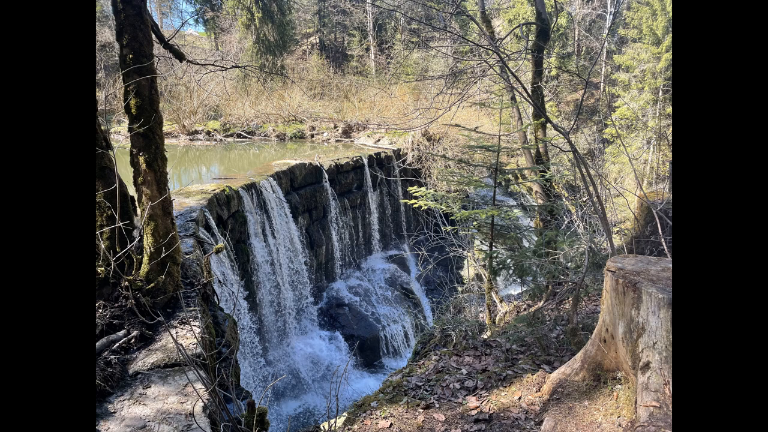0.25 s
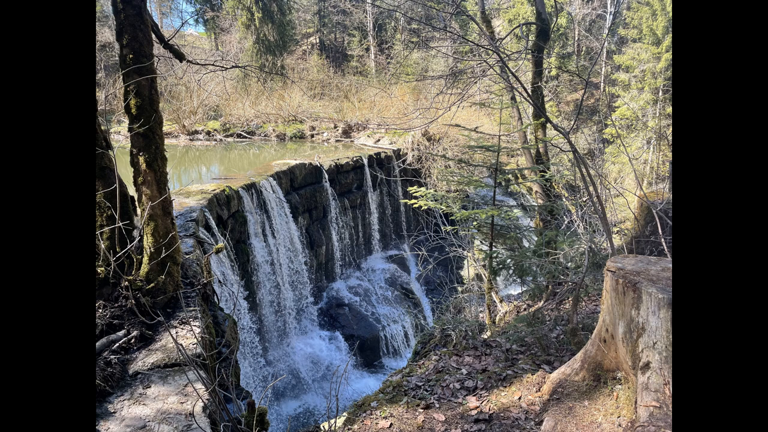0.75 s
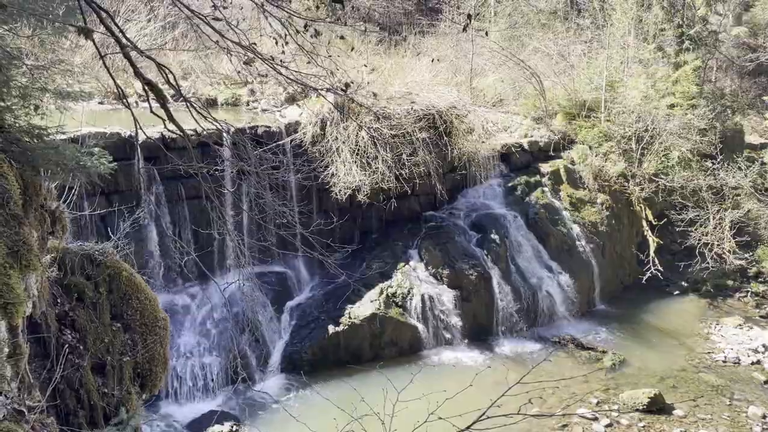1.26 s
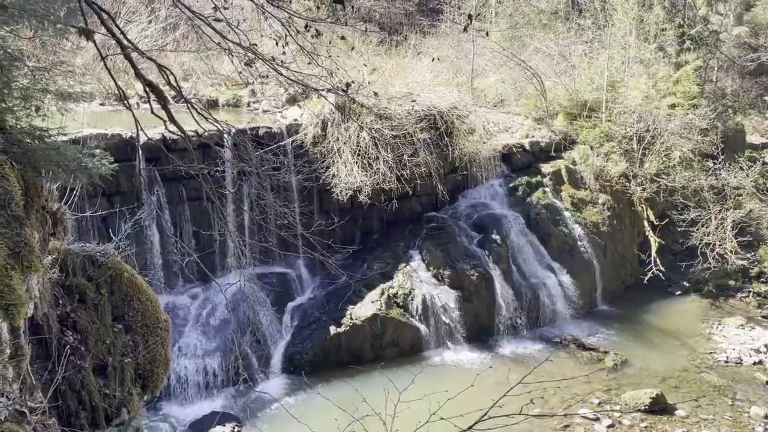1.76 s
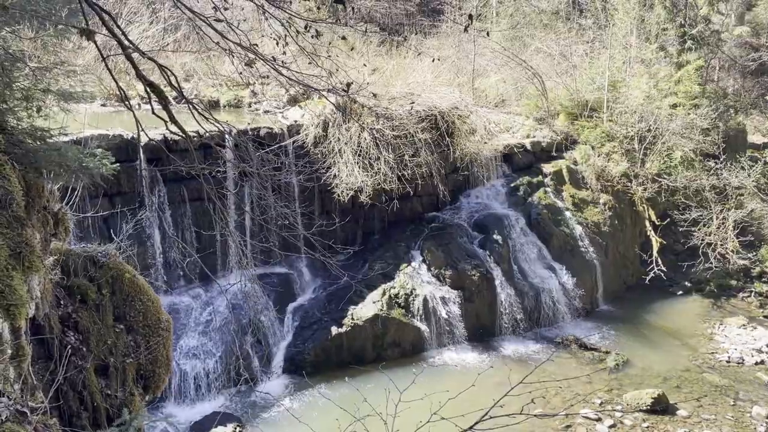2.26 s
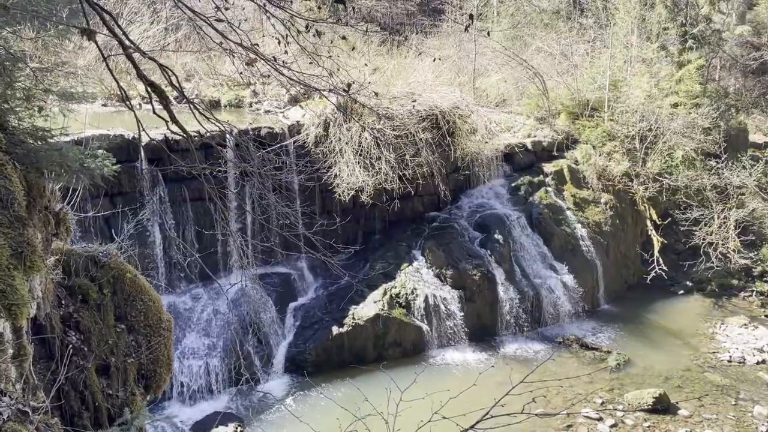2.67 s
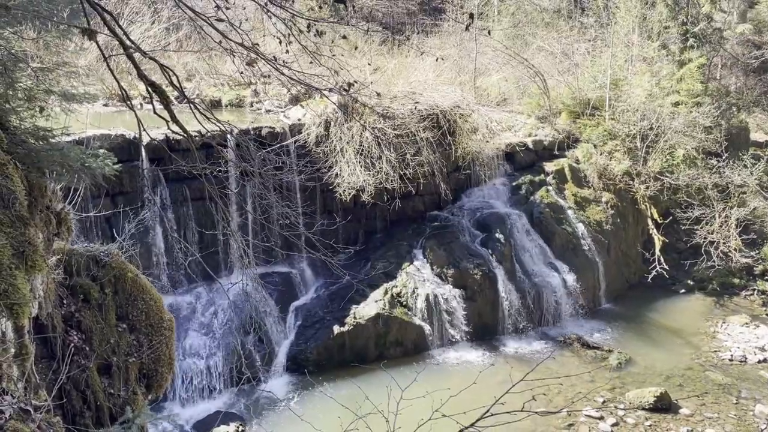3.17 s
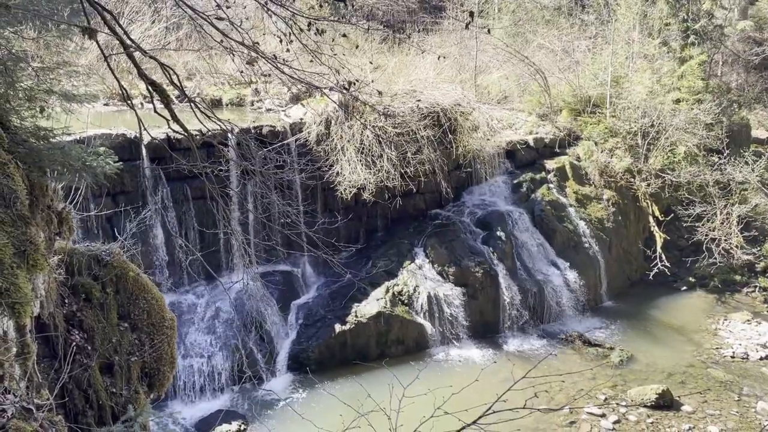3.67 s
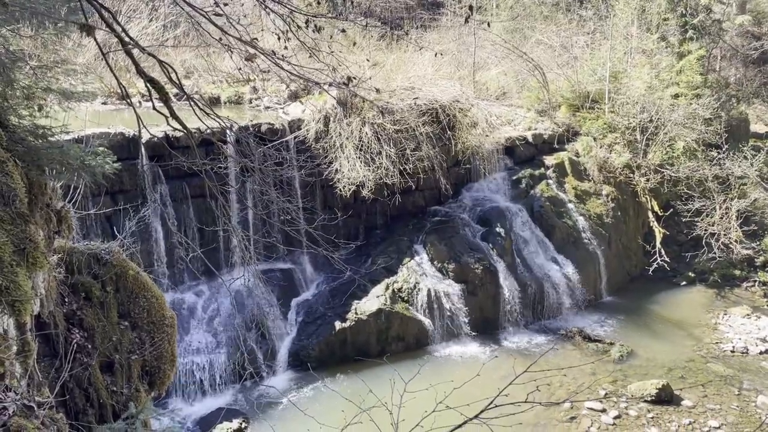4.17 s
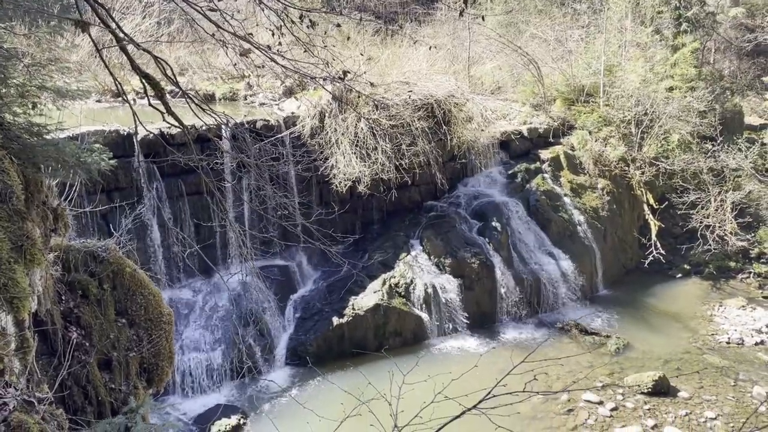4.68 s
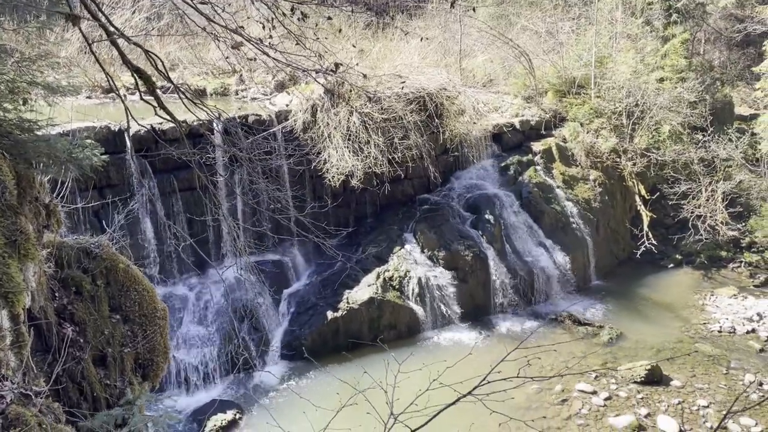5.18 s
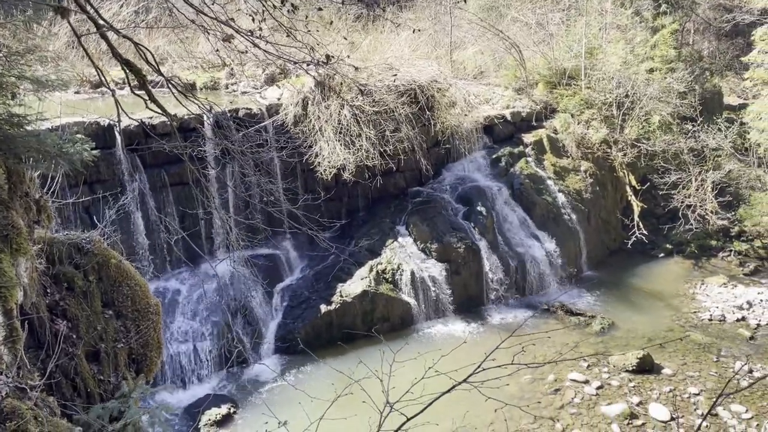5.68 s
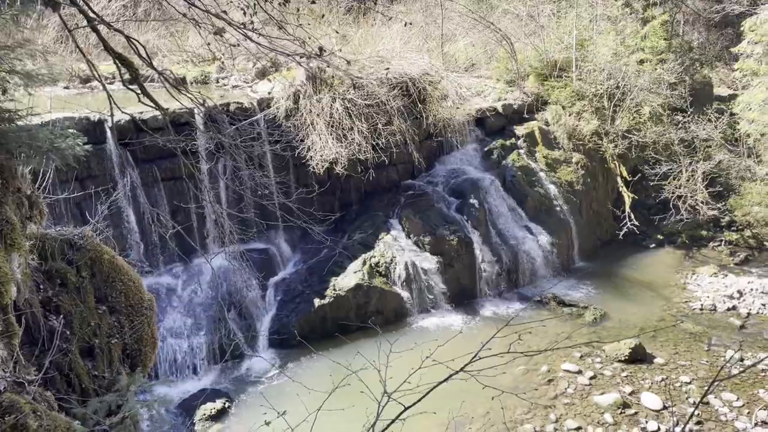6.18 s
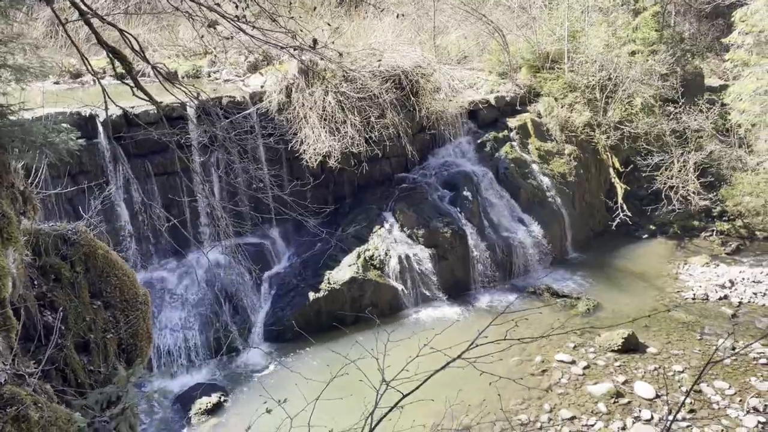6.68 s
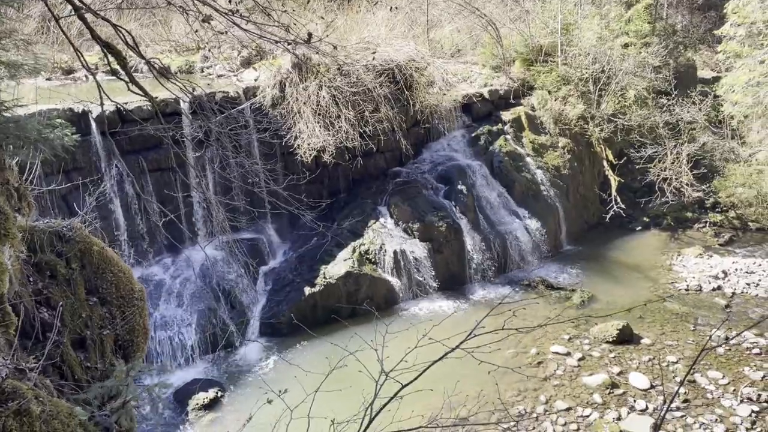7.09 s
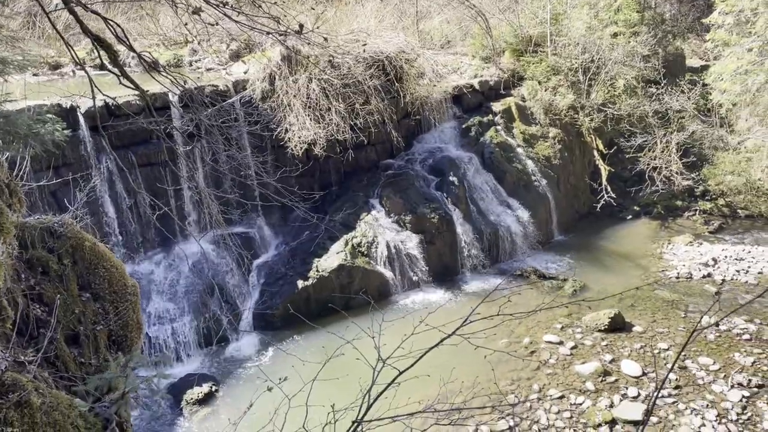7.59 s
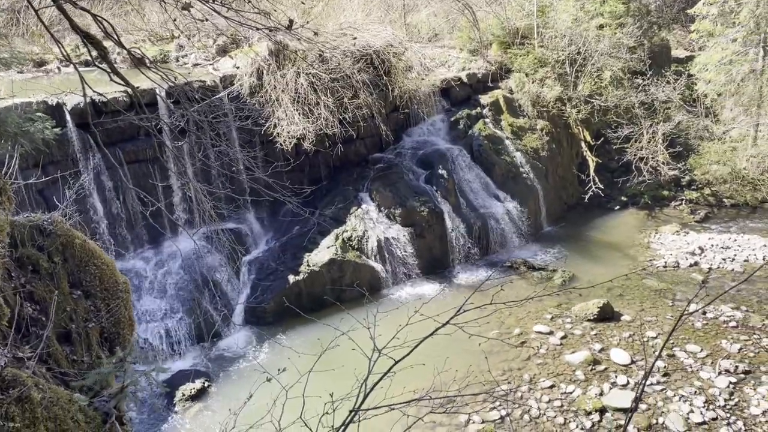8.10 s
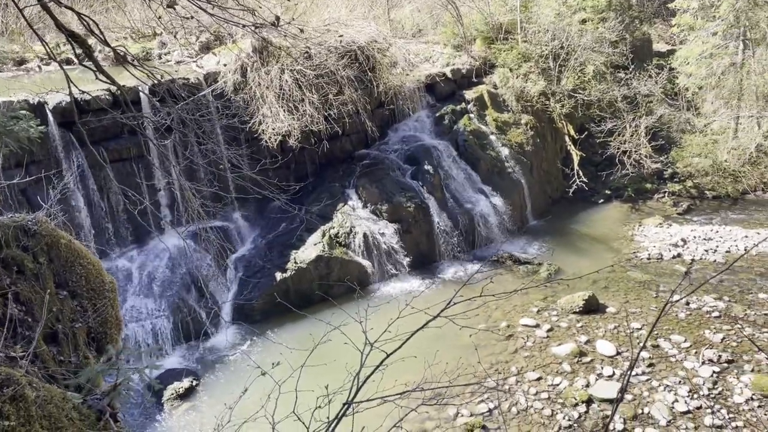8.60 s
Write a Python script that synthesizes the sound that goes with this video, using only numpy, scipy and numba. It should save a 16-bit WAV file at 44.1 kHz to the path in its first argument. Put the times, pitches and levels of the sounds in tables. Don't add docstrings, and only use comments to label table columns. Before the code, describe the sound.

The first 0.9 seconds are silent. Then, with a hard cut and no fade, a steady rush of several thin waterfalls begins, pouring over mossy rock ledges into a shallow pool outdoors, about twenty metres from a hand-held stereo microphone. Countless bubbles and droplets blur into a broad, even hiss with a full middle, soft top and only thin bass; it flickers slightly but barely changes level. It starts a touch fuller, eases by 1.2 seconds, and holds steady. A light breeze buffets the microphone with dull low thumps: scattered ones from 1 to 2.3, a cluster around 3, more near 3.6 to 4, and the heaviest bump at about 5.2 amid a busy run to 5.9. Wind is calmer from 6 to 7, with isolated bumps around 7.2 to 7.7 and a renewed flurry from 8.2 to 8.6. The water thins slightly, with more spray, at the end.

```python
import sys
import numpy as np
from scipy import signal
from scipy.fft import rfft, irfft, next_fast_len
from scipy.io import wavfile
from scipy.ndimage import uniform_filter1d
from numba import njit

SR = 44100
rng = np.random.default_rng(int(sys.argv[2]) if len(sys.argv) > 2 else 0)


def put_to_file(sound):
    columns = np.atleast_2d(sound).T
    safe = np.clip(columns, -1, 1)
    whole_steps = np.round(safe * 32767)
    wavfile.write(sys.argv[1], SR, whole_steps.astype(np.int16))


def decibels_to_gain(level_db):
    exponent = np.asarray(level_db, float) / 20
    return 10 ** exponent


N = 390285
START_S = .8867
SIZE = next_fast_len(N)
HZ = np.arange(SIZE // 2 + 1) * SR / SIZE

# t/s, flow level/dB, spray over flow/dB
FALLS_FLOW = [
    (0.9, -28.5, -4.5),
    (1.21, -30.5, -2.5),
    (2.65, -29.5, -3.5),
    (4.66, -29.5, -3.5),
    (6.52, -29.5, -2.5),
    (8.81, -30.5, -2.5),
    (8.85, -31.5, 0),
]
# f/Hz, density/dB per Hz
LEFT_COLOUR = [(300, -2.2), (580, 1), (1000, .6), (1800, -.8), (2050, -4.6), (2600, -6.5), (5500, -6.8),
               (6050, -9.8), (6600, -10), (8000, -12), (10000, -14), (11000, -16.8), (13000, -18.7),
               (15500, -18.2)]
# f/Hz, right minus left/dB
RIGHT_SHADE = [(400, 0), (550, -1.2), (1000, -2.5), (1750, -3.2), (2050, -.5), (2400, 0), (2800, -1.5),
               (3300, -.8), (4100, -3), (5000, -1), (5600, -3), (6200, -2), (7200, -1.5), (7900, 0)]
# f/Hz, likeness/0-1
PORT_LIKENESS = [(280, .92), (550, .64), (950, .63), (1350, .53), (1700, .32), (2100, .74), (2700, .65),
                 (3300, .72), (4200, .48), (5500, .68), (7200, .8), (7900, .93), (8700, .92), (10600, 1)]
# f/Hz, phase/rad
RIGHT_LEAD = [(300, .3), (700, 0), (1800, -.4), (2050, -.1), (2700, -1), (4300, .3), (5200, -.3),
              (6400, .6), (7200, 1.8), (8130, 3.14), (11000, 5.95), (12200, 6.65), (14900, 9.42),
              (16000, 10.5)]
# f/Hz, density/dB per Hz
PLUNGE_BASS = [(30, -45), (60, -13), (110, -5.5), (160, -6), (220, -2.5)]
# t/s, level/dB
BREEZE_LEVEL = [(.9, -41), (1.3, -47), (2.2, -45), (2.55, -60), (2.75, -44), (3.1, -33), (3.48, -46),
                (3.84, -39.5), (4.4, -41.5), (4.74, -37), (5.3, -36.5), (5.65, -42.5), (6.3, -51.5),
                (6.61, -37), (6.97, -54), (7.55, -40), (8.5, -36), (8.85, -44)]
# f/Hz, density/dB per Hz
EDDY_COLOUR = [(15, -30), (25, -24), (47, 2.5), (70, 2.5), (150, -7.5), (220, -14), (400, -41.5)]
# t/s, peak level/dB, f/Hz
STRONG_EDDIES = [(1.011, -24, 114), (1.79, -22.5, 162), (2.293, -25, 112), (2.821, -22.5, 111),
                 (2.975, -24, 80), (3.03, -18, 86.5), (3.241, -25, 72), (3.576, -21, 102),
                 (3.87, -21, 85.5), (4.017, -25, 62), (4.258, -27, 93), (4.708, -25, 69), (4.747, -26, 66),
                 (4.961, -25, 76), (5.156, -23, 100), (5.1675, -14.5, 126), (5.247, -18, 84),
                 (5.314, -21, 94.5), (5.424, -19.5, 119), (5.576, -22.5, 101), (5.707, -26, 122),
                 (5.938, -23.5, 104), (7.21, -26, 133), (7.556, -27, 87), (7.666, -25, 66),
                 (8.178, -22.5, 74), (8.251, -26, 85.6), (8.398, -22, 115), (8.565, -20, 91),
                 (8.641, -22, 71)]


def over_hz(table, warp=np.log1p):
    hz, value = np.transpose(table)
    return np.interp(warp(HZ), warp(hz), value)


def over_time(table):
    s, *columns = np.transpose(table)
    return [np.interp(np.arange(N) / SR, s, column) for column in columns]


def unit(x):
    return x / np.sqrt(np.mean(x ** 2))


def walk(rate):
    hold = int(SR / rate)
    steps = np.repeat(rng.standard_normal(N // hold + 1), hold)
    slewed = uniform_filter1d(uniform_filter1d(steps, hold), hold)
    return unit(slewed[:N])


@njit
def bubble_rings(start, hz, cycles, size, glide):
    out = np.zeros(N)
    for b in range(len(start)):
        length = cycles * SR / hz[b]
        ring = size[b] + 0j
        step = np.exp(2j * np.pi * hz[b] / SR - 3 / length)
        climb = np.exp(2j * np.pi * hz[b] / SR * glide / length)
        for i in range(start[b], min(N, start[b] + int(2 * length))):
            out[i] += ring.imag
            ring, step = ring * step, step * climb
    return out


def foam(count=90000):
    when, pitch, big = rng.random((count, 3)).T
    start = (when * N).astype(np.int64)
    hz = 250 * 40 ** pitch
    size = decibels_to_gain(15.3 * big) * hz ** .5
    bubbles = bubble_rings(start, hz, 5.0, size, 0.14)
    hiss = rng.standard_normal(N)
    rush = rfft(hiss + decibels_to_gain(-15.0) * unit(bubbles), SIZE)
    out, surge = 0, walk(5)
    for octave in range(12):
        distance = np.clip(np.log2(HZ / 10 + 1e-9) - octave, -1, 1)
        band = np.cos(distance * np.pi / 2) ** 2
        flicker_db = .2 * surge + .3 * walk(8) + .5 * walk(20)
        out = out + irfft(rush * band, SIZE)[:N] * decibels_to_gain(flicker_db)
    return rfft(out, SIZE)


def falls():
    shared, apart = foam(), foam()
    like = over_hz(PORT_LIKENESS)
    lead = np.exp(1j * over_hz(RIGHT_LEAD, np.asarray))
    right = like * shared * lead + np.sqrt(1 - like ** 2) * apart
    colour_db = over_hz(list(PLUNGE_BASS) + list(LEFT_COLOUR))
    ports = np.array([shared, right * decibels_to_gain(over_hz(RIGHT_SHADE))]) * decibels_to_gain(colour_db)
    flow_db, spray_db = over_time(FALLS_FLOW)
    high = 1 / (1 + (2200 / (HZ + 1)) ** 4)
    body = irfft(ports * (1 - high), SIZE)[:, :N]
    spray = irfft(ports * high, SIZE)[:, :N] * decibels_to_gain(spray_db - np.mean(spray_db))
    return unit(body + spray) * decibels_to_gain(flow_db + 4.0)


def puffs(count=90):
    over_breeze_db, scatter_db = 10.5, 1.5
    centre_hz, spread_octaves = 95, .35
    when, size, pitch = rng.standard_normal((count, 3)).T
    s = (np.arange(count) + .5 + when) * N / SR / count
    db = np.interp(s, *np.transpose(BREEZE_LEVEL)) + over_breeze_db + scatter_db * size
    return list(zip(s, db, centre_hz * 2 ** (spread_octaves * pitch)))


def buffets(cycles=.7, sag=.2, snap=.9):
    out = np.zeros(N)
    eddies = list(STRONG_EDDIES) + puffs()
    for (s, db, hz), twist in zip(eddies, rng.standard_normal(len(eddies))):
        first = max(int((s - .05) * SR), 0)
        last = min(int((s + .05) * SR), N)
        i = np.arange(first, last)
        turns = (i / SR - s) * hz
        strength = decibels_to_gain(db + 16.0)
        phase = twist * max(1 - strength, 0) * 2
        swing = np.cos(2 * np.pi * (turns - sag * turns ** 2) + phase)
        fade = np.exp(-(turns / cycles) ** 2)
        edge = snap * strength * np.exp(-(turns / .07) ** 2)
        out[i] -= decibels_to_gain(db) * (swing * fade + edge)
    return out


def rumble():
    noise = rfft(rng.standard_normal(N), SIZE)
    return unit(irfft(noise * decibels_to_gain(over_hz(EDDY_COLOUR)), SIZE)[:N])


def wind():
    mid, side = rumble(), rumble()
    flutter_db = 1.5 * walk(25) + 2 * walk(7)
    gust = decibels_to_gain(over_time(BREEZE_LEVEL)[0] + 1 + flutter_db)
    mid = mid * gust + buffets()
    sweep = np.gradient(mid) * SR * 0.000083
    side = decibels_to_gain(-10) * side * gust - sweep
    return np.array([mid + side, mid - side])


def scene():
    heard = np.arange(N) >= START_S * SR
    return (falls() + wind()) * heard


def roll_off(x):
    return signal.sosfilt(signal.butter(12, 15780, fs=SR, output="sos"), x)


def record(dry):
    bass_cut = signal.butter(2, 35, "highpass", fs=SR, output="sos")
    top_cut = signal.ellip(10, .1, 80, 15800, fs=SR, output="sos")
    mix = signal.sosfilt(np.vstack([bass_cut, top_cut]), dry)
    return roll_off(mix)


dry = scene()
out = record(dry)
put_to_file(out)
```